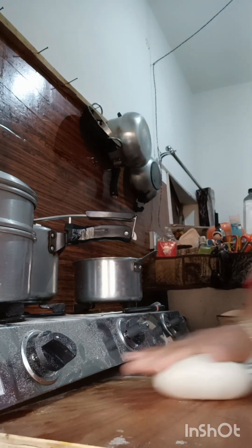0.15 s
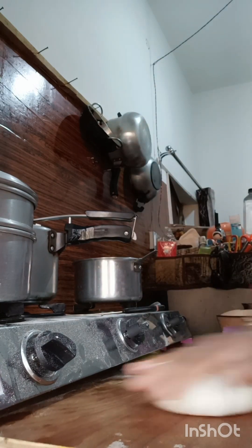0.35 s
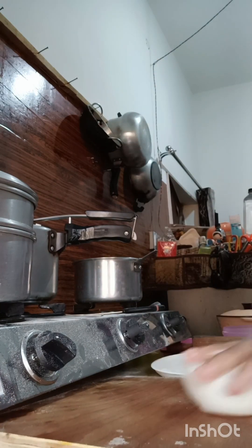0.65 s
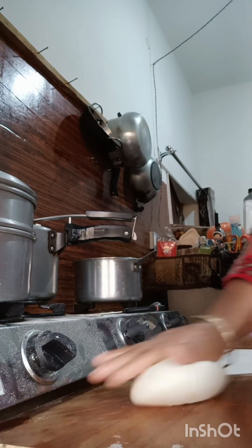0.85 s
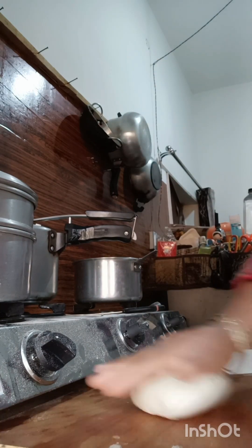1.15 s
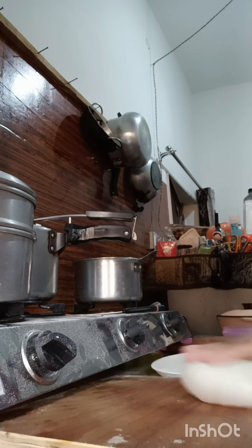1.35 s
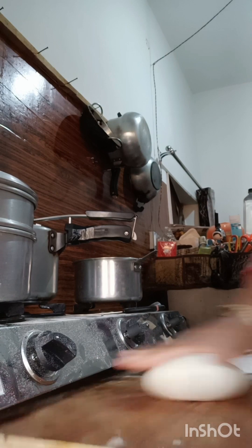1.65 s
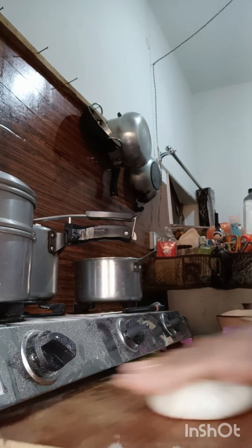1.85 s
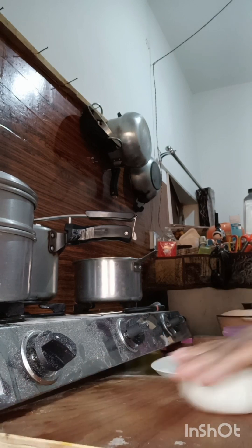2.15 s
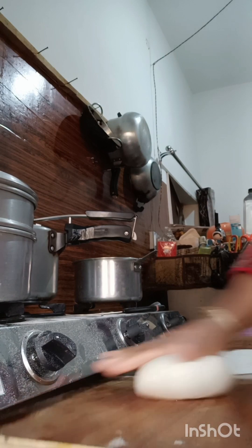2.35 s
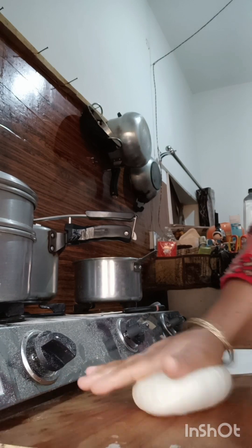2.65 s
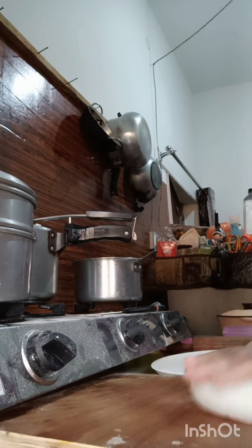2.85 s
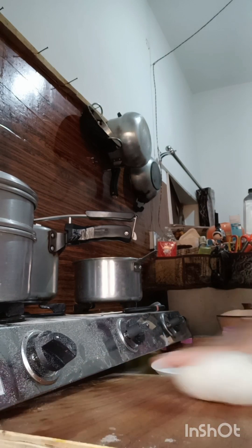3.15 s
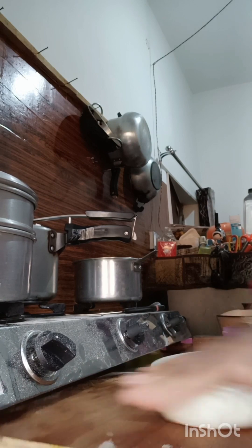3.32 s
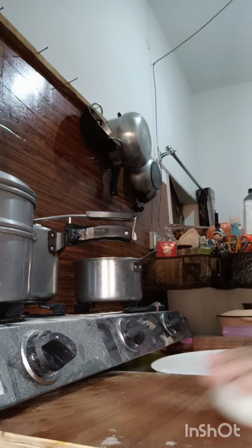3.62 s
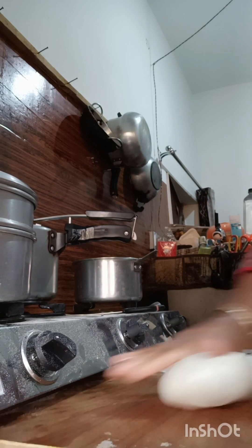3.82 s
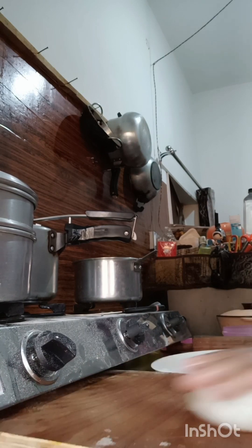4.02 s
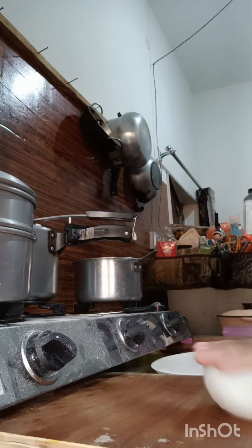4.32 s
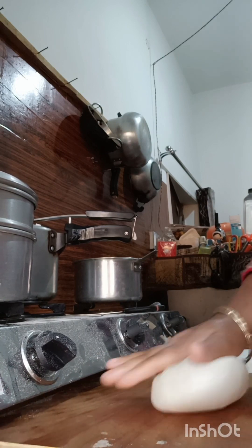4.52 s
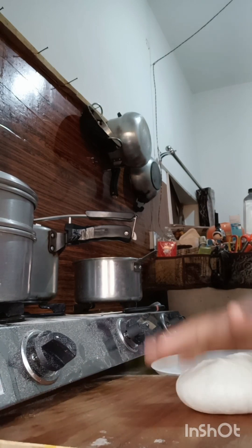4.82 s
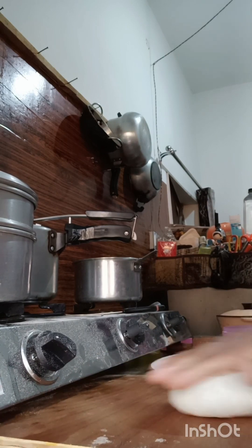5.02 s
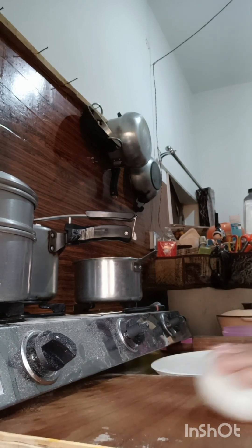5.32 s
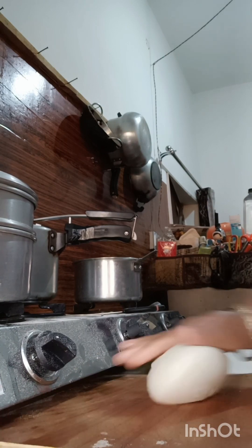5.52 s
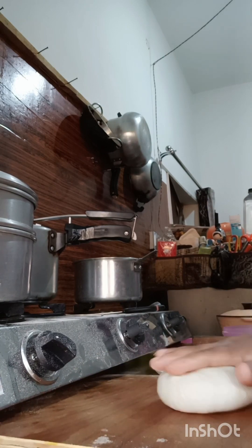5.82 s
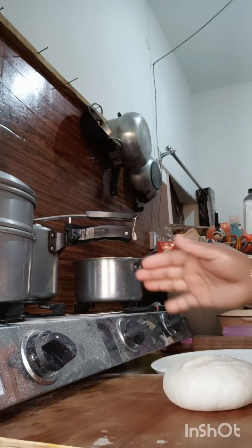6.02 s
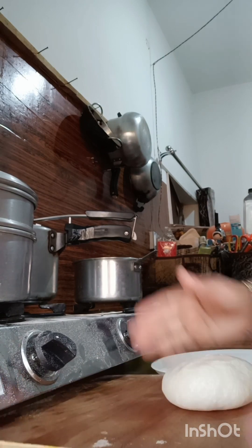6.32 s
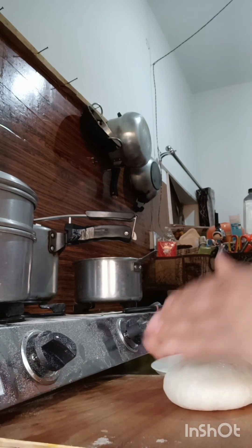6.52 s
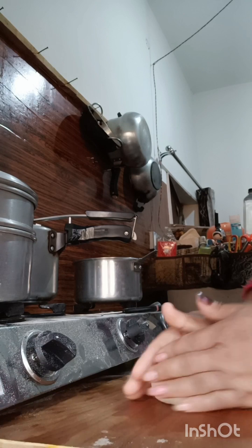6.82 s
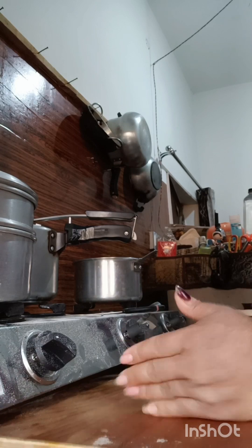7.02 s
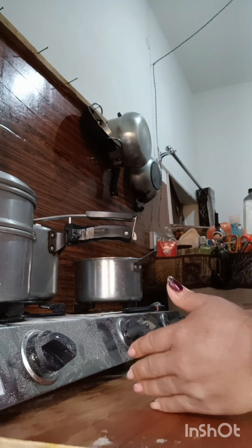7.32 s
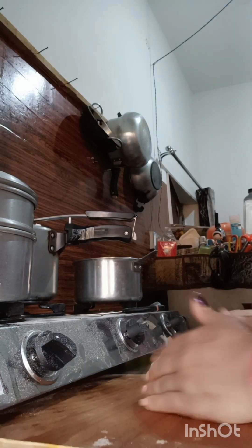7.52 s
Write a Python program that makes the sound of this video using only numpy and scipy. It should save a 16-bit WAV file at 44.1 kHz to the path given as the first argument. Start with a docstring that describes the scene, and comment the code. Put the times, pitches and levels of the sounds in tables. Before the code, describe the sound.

Close microphone on a wooden kitchen counter in a small, slightly lively room. Dough lands in steady, heavy strokes, with deep woody resonance, puffs of squeezed air and short crackling reflections. Bright metal bangles tick and jingle on the wrist throughout; a few weak birdlike whistles come from afar. After one delayed final stroke, hands pat the dough, rub off flour with dry rasps, and clap, with one solid knock near the end.

```python
"""Over quiet room noise, a hand already rolls floury dough, thin bangles jingle and a few faint distant chirps are heard.
Then the ball of dough is slapped and rolled, stroke after stroke, on a wooden kitchen counter close by: each slap
sets the counter's modes booming and noise bursts of squeezed air are answered by the small room.
At the end the dough is patted, and the hands brush and clap off flour: rasping noise and cracks of skin.
The bangles, runs of tiny contacts on ringing modes, jingle on the wrist all along."""
import sys
import numpy as np
from scipy import signal
from scipy.fft import rfft, irfft, next_fast_len
from scipy.io import wavfile
from scipy.ndimage import uniform_filter1d

SR = 44100
rng = np.random.default_rng(int(sys.argv[2]) if len(sys.argv) > 2 else 0)


def output_pcm(signal):
    """Save a mono or channel-first signal as 16-bit PCM at the path in sys.argv[1].

    Samples are clipped to [-1, 1] before scaling.
    """
    pcm = np.clip(np.atleast_2d(signal).T, -1, 1) * 32767
    wavfile.write(sys.argv[1], SR, np.round(pcm).astype(np.int16))


N = 337806

# kneading strokes, the dough slapped down and rolled; all but t and knock are relative to the knock:
# (t/s, knock/dB, weight/dB, slap/dB, slap's sharp edge/dB, bright answer of the room/dB,
#  lean of the hand/dB, jolt of the bangles/dB)
STROKES = [(0.723, -23.5, -8, -13, -14.5, -24.5, -31, -34),
           (1.09, -21, -8.5, -6.5, -24.5, -21.5, -24, -25.5),
           (1.459, -19, -14, -1.5, -13.5, -17.5, -23, -31), (1.838, -21, -13, -1.5, -12, -24, -28.5, -35),
           (2.215, -22.5, -7.5, -5.5, -12, -38, -26, -19), (2.567, -20, -14, -2, -10, -18.5, -21.5, -45),
           (2.916, -20.5, -6.5, -7.5, -13.5, -14.5, -36, -45),
           (3.314, -23, -10.5, -3, -15, -28, -33, -22.5), (3.687, -22, -11, -5.5, -20, -35, -35, -35),
           (4.056, -20, -20, -2.5, -9, -40, -28, -28.5), (4.417, -19, -22.5, -1, -13.5, -28.5, -39, -24),
           (4.766, -21.5, -29.5, -6.5, -28, -30, -47, -47), (5.386, -21, -13, -4.5, -18.5, -48, -45, -30)]
# the hand patting the dough or settling on the counter: (t/s, knock/dB, weight relative to it/dB)
PATS = [(5.037, -51, 6.5), (6.2, -50, 12.5), (6.248, -54.5, 20.5), (6.3, -43.5, 4), (6.735, -53.5, 4.5),
        (6.803, -65, 11), (7.0, -60.5, 25), (7.07, -20.5, -22.5), (7.267, -42.5, 10), (7.295, -41, 6)]
# hiss of sliding flour and ticking bangles: (f/Hz, level per Hz/dB)
HISS_SPECTRUM = [(2000, -8), (6000, -2.5), (7200, -8.5), (7900, 3), (9100, 4), (11000, 2.5), (13000, -10),
                 (16000, -10.5)]


def amp(db):
    """Decibels to amplitude."""
    return 10 ** (np.asarray(db) / 20)


def unit(x):
    """Scaled to rms 1."""
    return x / np.sqrt(np.mean(x ** 2) + 1e-20)


def along(points, hz):
    """(f/Hz, value) points read on a log frequency axis."""
    f, v = np.transpose(points)
    return np.interp(np.log(hz + 1), np.log(f + 1), v)


def curve(rows):
    """(t/s, value) rows as one value per sample."""
    return np.interp(clock(N), *np.transpose(rows))


def clock(count):
    """Time axis of count samples, in seconds."""
    return np.arange(count) / SR


def add(track, s, sound):
    """Mix a sound into a track at time s."""
    start = max(0, round(s * SR))
    part = sound[..., :N - start]
    track[:, start:start + part.shape[-1]] += part


def filtered(x, response):
    """x shaped by a response that is a function of frequency."""
    n = x.shape[-1]
    m = next_fast_len(n + 8192)
    spectrum = rfft(x, m) * response(np.fft.rfftfreq(m, 1 / SR))
    return irfft(spectrum, m)[..., :n]


def noise(spectrum, count):
    """Coloured stereo noise of rms 1, alike in the bass and unrelated in the treble."""
    # (f/Hz, left-right correlation)
    likeness = [(60, 0.9), (300, 0.96), (640, 0.61), (1400, 0.12), (4000, 0)]

    def mid_side(hz):
        turn = np.arccos(np.clip(along(likeness, hz), -1, 1)) / 2
        return amp(along(spectrum, hz)) * np.array([np.cos(turn), np.sin(turn)])

    mid, side = filtered(rng.standard_normal((2, count)), mid_side)
    return unit(np.array([mid + side, mid - side]))


def swell(t, rise, fade):
    """Smooth rise to 1 in rise seconds, then a fall of 60 dB in fade seconds."""
    onset = np.sin(np.pi / 2 * np.minimum(t / rise, 1)) ** 2
    return onset * amp(-60 * np.maximum(t - rise, 0) / fade)


def swells(events, rise, fade):
    """One envelope for the whole scene: a swell for each (t/s, level/dB) event, their powers summed."""
    t = clock(N)
    return np.sqrt(sum((amp(db) * swell(np.maximum(t - s, 0), rise, fade)) ** 2 for s, db in events))


def flutter(size):
    """A random curve of rms 1, smooth over size samples."""
    return unit(uniform_filter1d(rng.standard_normal(N), size))


def burst(source, envelope):
    """Noise under a short envelope, each channel with the energy that the envelope gives."""
    x = source * envelope
    return x * np.linalg.norm(envelope) / np.linalg.norm(x, axis=1, keepdims=True)


def ringing(modes, t, drive_db, attack, scatter_db, port_phase):
    """A set of modes after one blow, each decaying at its own rate, at slightly new strengths each time."""
    hz, db, t60 = np.transpose(modes)
    level_db = db + drive_db + scatter_db * rng.standard_normal(len(hz))
    # neighbouring modes swing in opposite directions; the higher ones differ more in phase left to right
    stray_phase = port_phase * np.sqrt(hz / hz[-1]) * rng.standard_normal((2, len(hz)))
    phase = np.pi * np.arange(len(hz)) + stray_phase
    decay = amp(level_db[:, None] - 60 * t / t60[:, None])
    ring = decay * np.exp(2j * np.pi * hz[:, None] * t)
    return (np.exp(1j * phase) @ ring).imag * (1 - np.exp(-t / attack))


def kitchen(x, wet_db, build):
    """The sound and the room's answer: decaying noise that builds up as the walls reply."""
    # decay time of the room: (f/Hz, t60/s)
    room_decay = [(100, 0.36), (500, 0.27), (1500, 0.19), (4000, 0.2), (12000, 0.2)]
    flat_noise = noise([(100, 0), (16000, 0)], count=SR // 2)
    hz, t, z = signal.stft(flat_noise, SR, nperseg=256)
    decay = amp(-60 * t / along(room_decay, hz)[:, None])
    tail = signal.istft(z * decay, SR, nperseg=256)[1]
    tail = tail * np.minimum(clock(tail.shape[1]) / build, 1) ** 2
    answer = signal.fftconvolve(x, tail / np.linalg.norm(tail[0]), axes=1)[:, :x.shape[1]]
    return x + amp(wet_db) * answer


def room_air():
    """Steady quiet noise of the room."""
    # (f/Hz, level per Hz/dB)
    air_spectrum = [(12, -28), (20, 3.5), (70, 0), (101, -13.5), (172, -4.5), (247, -10), (620, -14),
                    (1210, -14.5), (1560, -15), (2370, -12.5), (2960, -17.5), (5950, -21.5), (7650, -35),
                    (13700, -25.5), (15800, -33)]
    return amp(-58.0) * noise(air_spectrum, N)


def chirps():
    """Thin whistles from far away, gliding in an arch of pitch and swelling with it."""
    # (t/s, length/s, start f/Hz, end f/Hz, arch height/Hz, level/dB)
    whistles = [(.11, 0.048, 1453, 1540, 9, -60), (0.177, 0.21, 1520, 1580, 188, -53),
                (0.904, .12, 2630, 2760, 27, -61.5), (3.487, 0.078, 3470, 3870, 63, -54.5),
                (4.65, 0.13, 2500, 2240, 8, -60)]
    out = np.zeros((2, N))
    for s, length, start_hz, end_hz, arch_hz, db in whistles:
        progress = clock(int(length * SR)) / length
        arch = np.sin(np.pi * progress)
        pitch = start_hz + (end_hz - start_hz) * progress + arch_hz * arch
        add(out, s, amp(db) * arch ** 2 * np.sin(2 * np.pi * np.cumsum(pitch) / SR))
    return kitchen(out, wet_db=-0.5, build=0.018)


def shaking():
    """The counter rumbles under the hand, most as it leans into each roll and just after a heavy pat."""
    # (f/Hz, level per Hz/dB)
    rumble_spectrum = [(20, -38), (42, 4), (55, 9), (75, -6.5), (110, -4), (200, -31.5), (400, -35),
                       (1500, -57.5)]
    # changing pressure of the hand on the counter, ahead of the press gain: (t/s, level/dB)
    effort = [(0.0, -67.5), (1.58, -52), (2.18, -67), (2.69, -54.5), (6.21, -78), (7.1, -52.5),
              (7.66, -63.5)]
    press = amp(curve(effort) + 4.5)
    # the hand's weight builds through the roll, then lets go
    lean_events = [(s, knock_db + lean_db) for s, knock_db, *_, lean_db, _ in STROKES]
    leans = swells(lean_events, rise=0.24, fade=0.39)
    # the counter shudders with the pat's weight
    pat_events = [(s, knock_db + weight_db - 4.5) for s, knock_db, weight_db in PATS]
    shudders = swells(pat_events, rise=0.012, fade=0.3)
    return np.linalg.norm([press, leans, shudders], axis=0) * noise(rumble_spectrum, N)


def bangles():
    """Two thin rings of slightly different size chatter in a quick run of tiny contacts; their ring is short."""
    # the wrist turning sharply, bangles clashing: (t/s, level/dB)
    jingles = [(0.0034, -40.5), (0.044, -47), (0.259, -47.5), (0.3532, -52), (0.603, -45), (0.934, -53.5),
               (1.0096, -47), (1.3648, -45), (2.1211, -49), (2.5015, -50.5), (3.233, -53.5),
               (3.9574, -51.5), (5.7733, -46.5), (6.3265, -50), (7.199, -51), (7.215, -47)]
    # modes of a bangle, ahead of the spread in size: (f/Hz, level/dB, t60/s)
    bangle_modes = [(6850, -13.5, 0.086), (7250, -20, 0.027), (9800, -28, 0.016), (9920, 3.5, 0.13),
                    (10070, -29, 0.34), (10055, 6, 0.033), (12700, -22, 0.036), (13300, -3, 0.084),
                    (12700, 0.5, 0.061), (14300, 0, .03)]
    jolt_delay_s = 0.0064  # the bangles slide on for a moment after the hand stops
    stray_count, stray_db = 7, -55.5  # faint chance touches
    pitch_spread = 0.013  # relative, from one bangle to the next
    contacts_per_s, chatter_fade_s = 600, 0.057

    out, t = np.zeros((2, N)), clock(count=SR // 7)
    jolts = [(s + jolt_delay_s, knock_db + jolt_db) for s, knock_db, *_, jolt_db in STROKES]
    strays = [(s, stray_db) for s in rng.uniform(0, N / SR, stray_count)]
    for s, level_db in [*jingles, *jolts, *strays]:
        touches = rng.random(len(t)) < contacts_per_s / SR
        contacts = touches * rng.standard_normal(len(t)) * amp(-60 * t / chatter_fade_s)
        contacts[0] = 1.0
        sizes = 1 + pitch_spread * rng.standard_normal(2)
        pair = np.vstack([np.array(bangle_modes) * [size, 1, 1] for size in sizes])
        ring = ringing(pair, t, 0, attack=0.0005, scatter_db=1.0, port_phase=1.16)
        tick = amp(1) * noise(HISS_SPECTRUM, len(t)) * swell(t, 0.0016, 0.018)
        chatter = signal.fftconvolve(ring + tick, contacts[None], axes=1)
        chatter = unit(chatter) * amp(level_db - 14.5)  # rms lies well under the nominal level
        add(out, s, kitchen(chatter, wet_db=-6.5, build=0.012))
    return out


def rubbing(catch_db):
    """Floury dough slides on the wood as it is rolled; later the hands brush off flour, catching and slipping."""
    # hand over dough or skin, levels ahead of the catching:
    # (t/s, rise/s, fade/s, rasp level/dB, hollow under the palm f/Hz, hiss level/dB)
    brushes = [(0, 0.0017, 0.55, -63, 2500, -51), (0.339, 0.011, 0.7, -83, 2500, -57),
               (5.001, 0.054, 0.41, -86, 2500, -59.5), (5.822, 0.029, 0.18, -43, 3320, -61),
               (6.467, 0.015, 0.23, -42.5, 2066, -48), (6.612, 0.04, 0.76, -53.5, 2520, -51),
               (7.47, 0.041, 0.26, -54.5, 2630, -50.5)]
    # (f/Hz, level per Hz/dB)
    rasp_spectrum = [(200, -27), (900, -5.5), (2400, 4), (4000, 1), (6000, -5), (8000, -18), (16000, -44)]
    # after each landing the dough slides on the flour, slowing down, over a steady faint hiss
    sliding = swells([(s, -64.5) for s, *_ in STROKES], rise=0.1, fade=1.0)
    out = np.hypot(sliding, amp(-73.5)) * noise(HISS_SPECTRUM, N)
    t = clock(count=SR // 2)
    for s, rise, fade, rasp_db, hollow_hz, hiss_db in brushes:
        def hollow(hz):
            return 1 + 1.0 / (1 + ((hz - hollow_hz) / 330) ** 2)

        rasp = amp(rasp_db) * unit(filtered(noise(rasp_spectrum, len(t)), hollow))
        hiss = amp(hiss_db) * noise(HISS_SPECTRUM, len(t))
        add(out, s, swell(t, rise, fade) * (rasp + hiss))
    return out * amp(catch_db * flutter(size=900))


def claps():
    """A crack of skin, coloured by the pocket of air under the palm, which rings on for a moment."""
    # skin on dough or skin, crack ahead of a common trim:
    # (t/s, crack level/dB, trapped air f/Hz, its boost/dB, its after-ring level/dB)
    hand_claps = [(6.1841, -12, 1170, 16.5, -54), (6.952, -22, 4410, 10, -38), (6.977, -9, 2340, 18, -29),
                  (7.166, -21, 940, 17.5, -46)]
    # (f/Hz, level per Hz/dB)
    skin_spectrum = [(150, 13), (700, -5.5), (1800, 1), (3500, 3.5), (6000, 0.5), (7200, -5), (9000, -4.5),
                     (15000, -18.5)]
    out, t = np.zeros((2, N)), clock(count=SR // 3)
    for s, crack_db, pocket_hz, boost_db, ring_db in hand_claps:
        def pocket(hz):
            return 1 + amp(boost_db) / (1 + ((hz / pocket_hz - 1) / 0.36) ** 4)

        contact = swell(t, 0.001, 0.015)
        crack = amp(crack_db - 8.0) * burst(filtered(noise(skin_spectrum, len(t)), pocket), contact)
        # the after-ring sits a little under the pocket's pitch
        ring = amp(ring_db) * np.sin(2 * np.pi * 0.96 * pocket_hz * t) * swell(t, 0.0011, 0.092)
        add(out, s, kitchen(crack + ring, wet_db=-5, build=0.0029))
    return out


def landing(knock_db, weight_db, slap_db, edge_db, bright_db):
    """A dull push, the counter's ring, air slapped out from under the dough, the room's bright crackling answer."""
    # modes of the counter and the stove on it: (f/Hz, level/dB, t60/s)
    counter_modes = [(54.94, -4.5, 1), (73.12, 3, 0.54), (94.2, 5.5, 0.41), (104.1, 1.5, 0.26),
                     (134.7, -7, 0.43), (157.1, -3.5, 0.29), (171, 3.5, 0.32), (196, -25, 0.073),
                     (272.8, -4, 0.25), (291.2, -3, 0.3), (333, -16, 0.34), (354.7, -30, 0.66),
                     (410.2, -7, 0.24), (455, -8.5, 0.083), (550, -9, 0.22), (700, -7, 0.15),
                     (742.5, -10, 0.15), (837, -19, 0.15), (854.5, -14, 0.36), (920, -18.5, 0.36),
                     (962.7, -7, 0.16), (1104, -6.5, 0.057)]
    # short-lived resonances of the air under the landing dough: (f/Hz, level/dB, t60/s)
    air_modes = [(916, 7.5, 0.017), (1168, -13, 0.12), (1316, -2, 0.046), (1542, 14.5, 0.013),
                 (1635, 10.5, 0.019), (1946, 8.5, 0.036), (2200, 7, 0.032), (2388, 3, 0.045),
                 (2690, 5.5, 0.027), (3450, -7, 0.044)]
    # escaping air, and the room's bright answer to the slap: (f/Hz, level per Hz/dB)
    slap_spectrum = [(200, 8), (600, -38), (950, 9), (1550, -2.5), (2400, -14), (2800, -1.5), (3100, -8),
                     (5000, -31), (9000, -26), (16000, -41)]
    bright_spectrum = [(300, -27), (900, 14.5), (2500, 21.5), (3400, 12.5), (5500, 8.5), (7200, -1.5),
                       (8800, 6), (11000, -0.5), (15000, -13)]
    knock_spectrum = [(80, -4.0), (200, -0.5), (400, 1.0), (650, -9.0), (950, -5.5), (1250, -22.5), (2500, -47.0)]
    t = clock(count=SR * 3 // 4)

    # weight drives the low modes; a gentle press sets in more slowly
    weight_drive = [(60, 0.71 * weight_db), (110, 0.59 * weight_db), (165, 0.18 * weight_db), (270, 0)]
    drive_db = knock_db - 4.5 + along(weight_drive, np.transpose(counter_modes)[0])
    contact = np.interp(knock_db, [-45, -24], [0.008, 0.0025])  # seconds
    ring = ringing(counter_modes, t, drive_db, contact, scatter_db=2.0, port_phase=0.77)
    push_db = knock_db + 0.68 * weight_db + 7.5
    push = amp(push_db) * np.sin(2 * np.pi * 135 * t) * swell(t, contact, 0.061)
    knock = amp(knock_db - 3) * burst(noise(knock_spectrum, len(t)), swell(t, contact, 0.099))

    # a flat landing squeezes the air out faster, so its slap has more edge
    colour = [(1650, knock_db + slap_db), (2300, knock_db + edge_db + 4.5)]
    air_drive_db = along(colour, np.transpose(air_modes)[0])
    pocket = amp(-5.0) * ringing(air_modes, t, air_drive_db, attack=0.00072, scatter_db=-1.0, port_phase=1.46)
    puff = burst(noise(slap_spectrum, len(t)), swell(t, 0.0027, 0.019))
    puff = filtered(puff, lambda hz: amp(along(colour, hz) + 1.5))

    bright = amp(knock_db + bright_db + 3) * noise(bright_spectrum, len(t)) * swell(t, 0.034, 0.19)
    bright = bright * amp(1.9 * flutter(size=40)[:len(t)])  # crackle
    return ring + push + kitchen(knock + pocket + puff, wet_db=-4.0, build=0.016) + bright


def kneading():
    """The dough lands once a stroke; pats are drier landings whose slap grows with their force."""
    # a harder pat traps more air: (knock/dB, slap relative to it/dB)
    pat_slap = [(-50, -26), (-20, -11.5)]
    out = np.zeros((2, N))
    for s, knock_db, weight_db, slap_db, edge_db, bright_db, _, _ in STROKES:
        add(out, s, landing(knock_db, weight_db, slap_db, edge_db, bright_db))
    for s, knock_db, weight_db in PATS:
        slap_db = np.interp(knock_db, *np.transpose(pat_slap))
        add(out, s, landing(knock_db, weight_db, slap_db, edge_db=slap_db - 6, bright_db=-49))
    return out


def scene():
    """All sources over the steady air of the room."""
    background = room_air() + chirps()
    hands = shaking() + bangles() + rubbing(catch_db=2) + claps()
    return background + hands + kneading()


def record(dry):
    """Rounds off the loudest peaks, colours the two channels differently, cuts deep bass and the very top."""
    # (f/Hz, left minus right level/dB)
    port_difference = [(100, 0.5), (700, 0.1), (2400, 4), (4400, 4), (6200, 4.5), (7100, 1), (7800, -72),
                       (9300, -9.5), (10200, -25), (12000, -1), (13300, -6), (15500, 33)]
    ceiling, low_cut_hz, top_hz = 0.33, 46, 15850

    def ports(hz):
        ratio = amp(along(port_difference, hz))
        balance = np.array([ratio, np.ones_like(hz)]) * np.sqrt(2 / (1 + ratio ** 2))  # keeps summed power
        low_cut = hz ** 3 / np.hypot(hz ** 3, low_cut_hz ** 3)
        return balance * low_cut * (hz < top_hz)

    rounded = dry / (1 + (dry / ceiling) ** 4) ** (1 / 4)
    return filtered(rounded, ports)


dry = scene()
out = record(dry)
output_pcm(out)
```